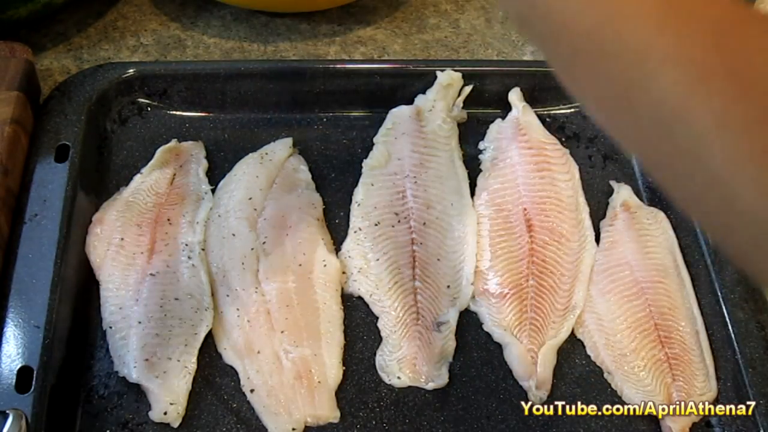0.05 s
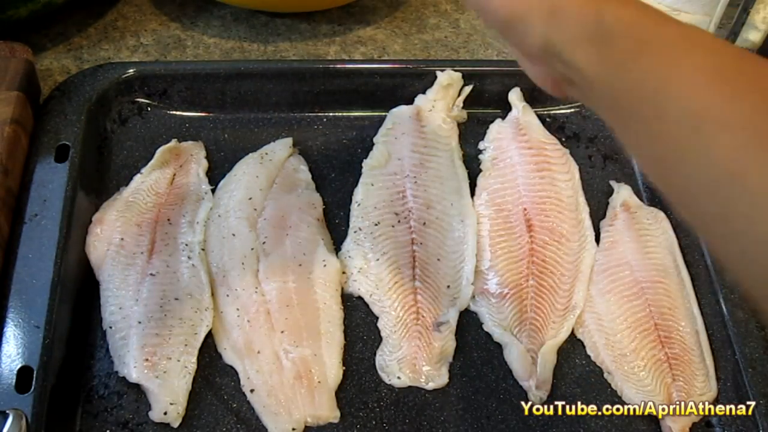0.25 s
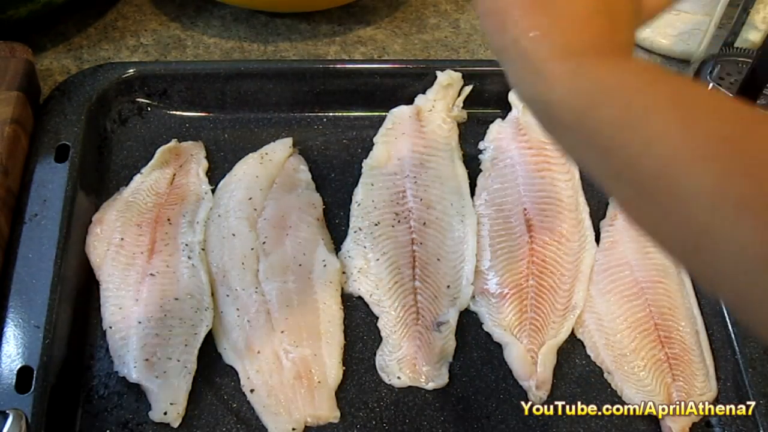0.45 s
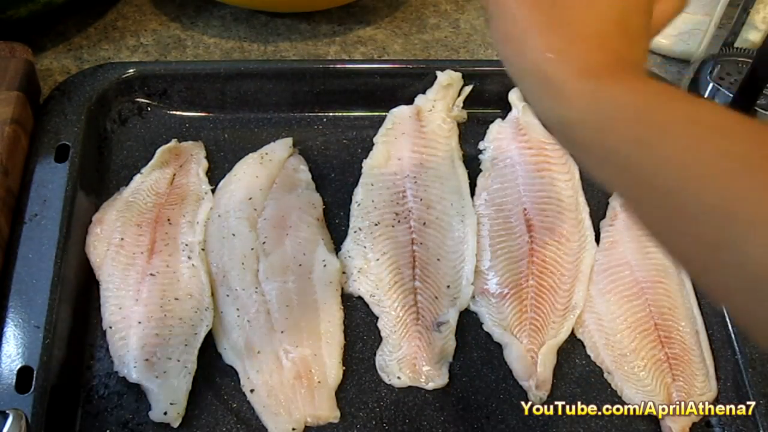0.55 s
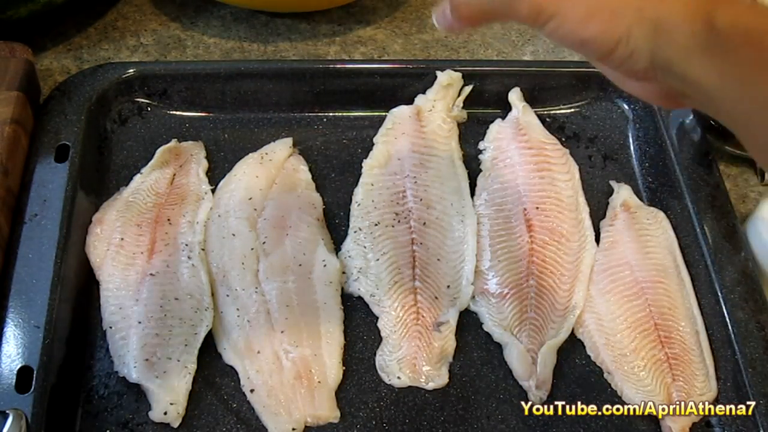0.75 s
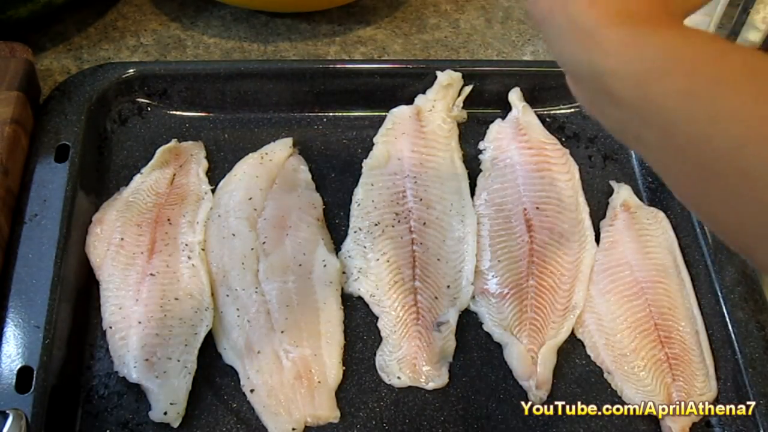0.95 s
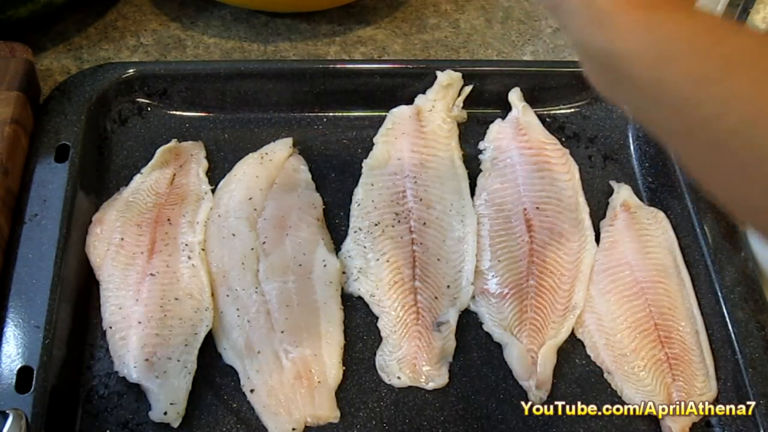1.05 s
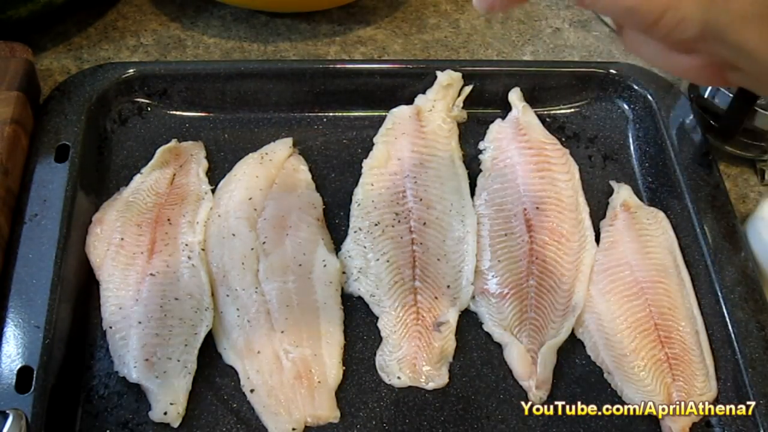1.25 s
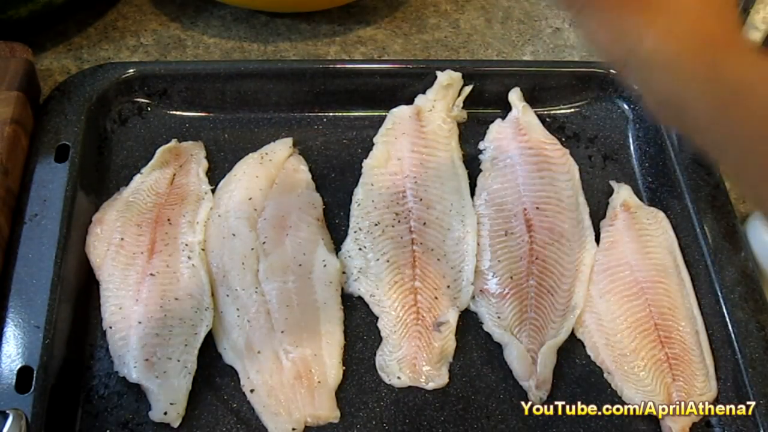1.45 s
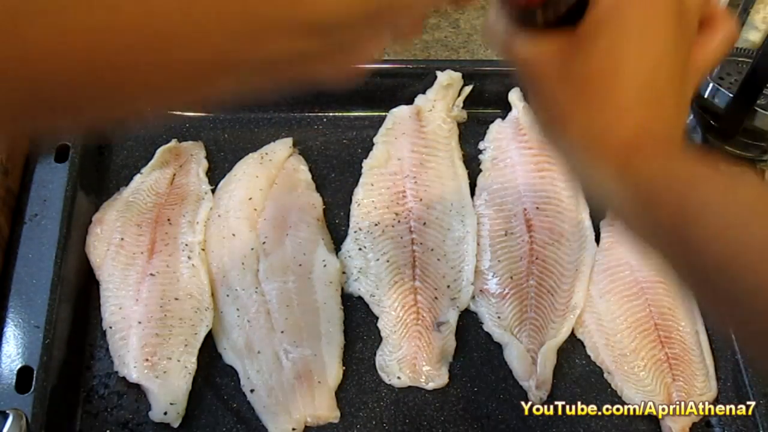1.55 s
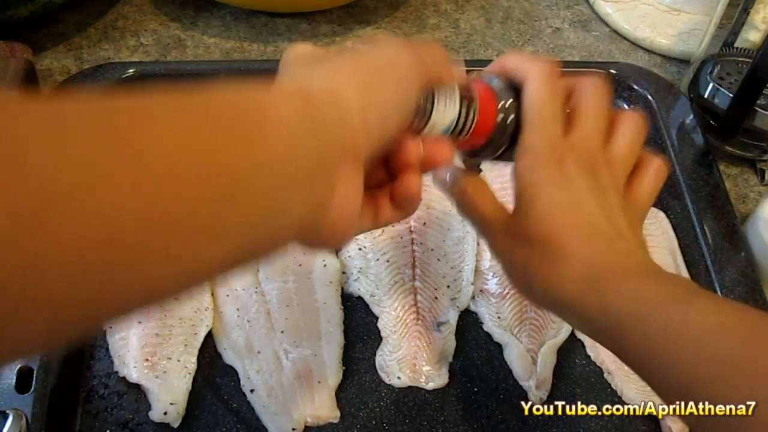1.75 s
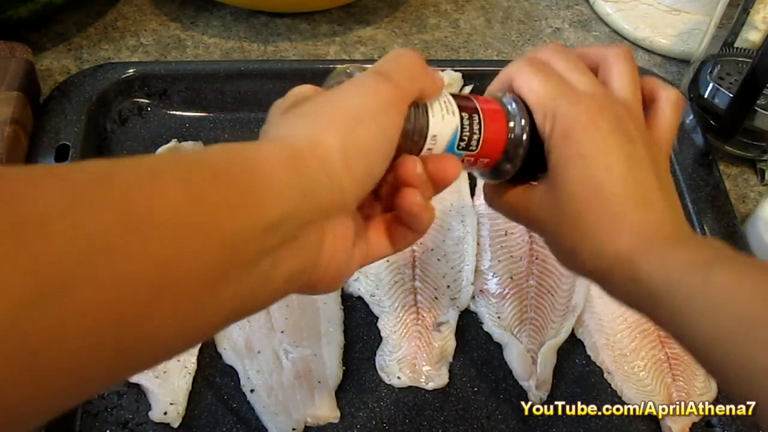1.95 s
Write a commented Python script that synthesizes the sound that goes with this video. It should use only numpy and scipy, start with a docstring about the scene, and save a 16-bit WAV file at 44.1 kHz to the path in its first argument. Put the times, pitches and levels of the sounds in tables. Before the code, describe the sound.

A hand-turned pepper mill grinds peppercorns, close and bright. A faint gritty scrape opens, then hard dry cracks burst at about 0.2-0.3 s and more strongly at 0.4-0.7 s. It softens, then snaps sharply again around 1.1-1.25 s. After a short lull, a faint squeak near 1.5 s and weaker crackles and scrapes trail off. Low appliance hum and short room reflections throughout.

```python
"""A hand-turned pepper mill crushes corns in a kitchen, over room noise and an appliance's hum throughout.
A gritty scrape and a wavering low tone come first, then hard, dry cracks at about 0.2-0.3 s and 0.4-0.7 s;
after a softer spell they return at about 1.1-1.25 s. A lull follows, then weaker cracks, scraping and a squeak.
Bursts of noise for the cracks and a stream of tiny grains for the grit ring the mill's short resonances.
Rubs, squeak and low tone are swells of filtered noise; the hard-walled room answers for a moment."""
import sys
import numpy as np
from scipy import signal
from scipy.fft import rfft, irfft, next_fast_len
from scipy.io import wavfile
from scipy.ndimage import uniform_filter1d, map_coordinates

SR = 44100
rng = np.random.default_rng(int(sys.argv[2]) if len(sys.argv) > 2 else 0)


def to_wav(s):
    """Save 16-bit WAV."""
    ch = np.atleast_2d(s).T  # columns
    pcm = np.round(np.clip(ch, -1, 1) * 32767)  # PCM
    wavfile.write(sys.argv[1], SR, pcm.astype(np.int16))


def boost_factor(decibels):
    """Convert a level in decibels to a linear amplitude factor."""
    exponent = np.asarray(decibels, float) / 20
    return 10 ** exponent


N = 88200

# the mill's resonances: (frequency [Hz], width [Hz], relative level [dB])
MILL = [(1216, 393, -7), (1402, 480, -7.5), (2780, 1020, -4), (4190, 560, -4), (4750, 226, -8),
        (5110, 485, -5), (7390, 2800, 5), (9380, 1950, 6), (11120, 3700, 2), (12980, 1030, -2.5),
        (14600, 12400, -2)]
BODY_HZ, BRIGHT_HZ = 2000, 6000  # the body lies below the first, the bright voice above the second


def unit(x):
    """Scales a sound to an rms of 1."""
    return x / np.sqrt(np.mean(x ** 2) + 1e-20)


def along(points, hz):
    """Reads a curve of (frequency [Hz], value) points on a log frequency axis."""
    f, v = np.transpose(points)
    return np.interp(np.log(hz + 1), np.log(f + 1), v)


def wobble(rate):
    """A smooth random curve through `rate` random points a second."""
    knots = rng.standard_normal(int(N * rate / SR) + 4)
    return map_coordinates(knots, [np.arange(N) * rate / SR])


def filtered(x, response):
    """Passes a sound through a filter, given as a function of frequency."""
    m = next_fast_len(N + SR // 2)  # spare room for the filter to ring out
    spectrum = rfft(x, m) * response(np.fft.rfftfreq(m, 1 / SR))
    return irfft(spectrum, m)[..., :N]


def resonance(f, center, width):
    """A band-pass response, like one springy part that vibrates most strongly at its own pitch."""
    return 1j * f * width / (center * center - f * f + 1j * f * width)


def modes(f):
    """The response of each resonance, one row each; neighbours alternate in sign, with a dip above the body."""
    center, width, db = np.transpose(MILL)[:, :, None]
    sign = (-1.) ** np.arange(len(MILL))[:, None] * np.where(center < BODY_HZ, -1, 1)
    return sign * boost_factor(db) / np.sqrt(width) * resonance(f, center, width)


def cracks():
    """Each splitting corn, a snap and a short noise burst, shakes the mill, most of all near its own pitch."""
    # corns that split, levels before the mill's bass is thinned:
    # (time [s], peak level [dB], body share [dB], favoured pitch [Hz])
    corns = [(0.0381, -45, 9, 4370), (0.1121, -28.5, -10.0, 7950), (0.1463, -27.5, -20, 10060),
             (0.1788, -31.5, -15, 4100), (0.21, -29, 6, 6950), (0.2227, -18.5, 4, 7300),
             (0.2335, -12.5, -1, 6950), (0.2424, -25, -4, 4280), (0.2483, -23.0, -2.0, 7300),
             (0.2701, -17, -4, 2300), (0.2842, -27, -3, 4010), (0.3041, -11, -4.5, 2840),
             (0.345, -32.5, -9.0, 3800), (0.4342, -17.5, -6, 8350), (0.4534, -20, -6, 8000),
             (0.461, -24.5, 4.5, 3900), (0.5428, -29, -7.0, 5230), (0.5752, -21.5, -1, 5600),
             (0.5872, -22.5, -17.0, 9230), (0.59, -14.5, -16, 9000), (0.6055, -12.5, 1, 4630),
             (0.6117, -14, 2.5, 4400), (0.6347, -20.5, -7.0, 3530), (0.6463, -5, 7.0, 3800),
             (0.65, -15.5, 5, 4470), (0.6573, -17, 0.5, 3550), (0.732, -17.5, -9.0, 8330),
             (0.8505, -37, -12, 6420), (0.9275, -36, -6.0, 7300), (0.9356, -32.5, -1, 7620),
             (0.9585, -34, -7.0, 2790), (0.9726, -27, -16.0, 4420), (1.02, -33, -2, 4500),
             (1.0273, -29, -1, 5700), (1.051, -32, -7.0, 8900), (1.0885, -30.5, -4, 11190),
             (1.1034, -23.5, -1.0, 7460), (1.1249, -16.5, 2.5, 4220), (1.1284, -6.5, -4, 7700),
             (1.1374, -33, 2, 7950), (1.1528, -22, -5.0, 7400), (1.1593, -14.5, -8.0, 7700),
             (1.1716, -17, -7, 3520), (1.174, -17.5, -6, 10400), (1.1903, -18, -5, 3000),
             (1.222, -19.5, -19, 5100), (1.244, -21, -7.0, 12460), (1.247, -22, -13, 11500),
             (1.4396, -39, -12.0, 5160), (1.4567, -38.0, -13.0, 10500), (1.4696, -33.5, -2, 9700),
             (1.4734, -38, -2.0, 8850), (1.4828, -35, -1, 5230), (1.4845, -27, -6.0, 9600),
             (1.4958, -42, -4, 5230), (1.508, -31, -4.0, 5300), (1.5176, -34, -13, 8480),
             (1.5214, -31.5, -10, 8300), (1.5637, -33, -12, 7960), (1.5866, -33.0, -6.0, 7600),
             (1.6415, -27, -18, 6200), (1.651, -32, -5, 8120), (1.6583, -40, -4, 5630),
             (1.675, -28.5, -1.0, 7400), (1.682, -36, -1, 8100), (1.6947, -29.5, -3, 7600),
             (1.7786, -38, 0.0, 2360), (1.7967, -37, 2, 4340), (1.8118, -26, 2, 3250),
             (1.8237, -36.5, 2, 2380), (1.8389, -39, -3.0, 8850), (1.8891, -32, -8.0, 4600),
             (1.9027, -35, -6.0, 6700), (1.924, -38, -4.0, 6150), (1.9351, -35.5, 1, 3920)]
    rise_s, t60_s = 0.00015, 0.0158  # the burst's rise and its time to fall by 60 dB
    snap_db, snap_grows = 17, 0.3  # basic snap; extra dB per dB of crack above -20 dB
    favour_db, favour_q = 9, 3.5  # lift of the favoured pitch over the rest, and its sharpness
    scatter_db = 3  # random spread of each resonance's strength
    size = 2048
    out = np.zeros(N + size)
    t = np.arange(size // 2) / SR
    f = np.fft.rfftfreq(size, 1 / SR)
    shape = (1 - np.exp(-t / rise_s)) * boost_factor(-60 * t / t60_s)
    snap = boost_factor(snap_db) * (np.arange(len(t)) == shape.argmax())  # one sample at the burst's top
    low = np.transpose(MILL)[0][:, None] < BODY_HZ
    for s, db, body_db, hz in corns:
        favour = boost_factor(-favour_db) + resonance(f, hz, hz / favour_q)
        scatter = boost_factor(scatter_db * rng.standard_normal((len(MILL), 1)))
        gains = scatter * np.where(low, boost_factor(body_db), favour)
        burst = shape * rng.standard_normal(len(t))
        sharp_snap = snap * boost_factor(snap_grows * max(db + 20, 0))
        mill_response = (gains * modes(f)).sum(axis=0)
        hit = irfft(rfft(burst + sharp_snap, size) * mill_response, size)
        peak = np.sqrt(2 * uniform_filter1d(hit ** 2, size=44).max())  # from the strongest 1 ms
        out[round(s * SR):][:len(hit)] += boost_factor(db) * hit / peak
    return out[:N]


def voicing(body_db, dull_db):
    """Boosts the body; dullness [dB] lifts the middle voice by half and lowers the bright voice by half."""
    hz = np.transpose(MILL)[0][:, None]
    upper_db = np.where(hz < BRIGHT_HZ, dull_db, -dull_db) / 2
    return np.where(hz < BODY_HZ, body_db, upper_db)


def ring(drive):
    """Each row of drive shakes its own resonance; the results add up."""
    return filtered(drive, modes).sum(axis=0)


def grit():
    """Fragments crumble in clumps of tiny grains over a smooth scrape, following the twist."""
    # twisting hand, levels before voicing and bass thinning:
    # (time [s], grit level [dB], body boost [dB], dullness [dB])
    twist = [(0, -45.5, 4.5, -3), (0.048, -42.5, 7.5, 8.5), (0.091, -52.5, -1, 2), (0.181, -43.5, 3, 1.5),
             (0.241, -28.5, 4, 7.5), (.3, -32.5, -24, 6.5), (.33, -40.5, -19, 3.5), (.42, -52, 6, 10),
             (.44, -44.5, 4, 11), (.48, -37, 6, 6), (0.529, -46.5, -3, 8), (0.592, -32.5, -5.5, 1),
             (.66, -34.5, 5, 5.5), (0.732, -25, -10, -2.5), (0.763, -44, 9, 0.5), (0.849, -54.5, -5, 0),
             (.92, -48, -3, 2), (0.948, -40.5, 6, 6), (0.998, -45.5, -1, 6.5), (1.029, -33.5, -11, -0.5),
             (1.089, -49.5, -5, 5), (1.136, -32, 9.5, 5), (1.248, -33.5, -31, 1), (1.282, -47, -4, 1.5),
             (1.42, -68, 3, -2), (1.491, -39, -5, 5), (1.53, -43, -8, -0.5), (1.56, -48.5, 2, 10),
             (1.63, -42.5, 5, 3), (1.693, -35, -4.5, 1), (1.74, -51, 4, 6.5), (1.8, -58, -4, 6),
             (1.816, -42, -5, 2), (1.871, -60.5, -16, -2), (1.921, -48.5, -3, 2), (2.0, -60.5, 17, 6)]
    grains_per_s, grain_t60_s = 1200, 0.003
    spread_db, biggest = 6, 2.2  # spread of grain sizes, and the largest size in spreads
    scrape_db, clump_db = -3, 1.5  # scrape against grains; strength of the clumping
    colour_drift_db, sheen_db = 2.16, 1.5  # fine grit favours the two highest resonances
    s, *columns = np.transpose(twist)
    level_db, body_db, dull_db = [np.interp(np.arange(N) / SR, s, c) for c in columns]
    starts = rng.random(N) < grains_per_s / SR
    sizes = starts * boost_factor(spread_db * np.minimum(rng.exponential(size=N), biggest))
    t = np.arange(400) / SR
    grains = signal.fftconvolve(sizes, boost_factor(-60 * t / grain_t60_s))[:N]
    force = unit(grains) + boost_factor(scrape_db)
    colour_db = [colour_drift_db * wobble(90) + sheen_db * (hz > MILL[-3][0]) for hz, *_ in MILL]
    drive = force * boost_factor(colour_db) * rng.standard_normal(N)
    rms = np.std(ring(drive))
    motion_db = level_db + clump_db * wobble(70.04) + voicing(body_db, dull_db)
    return ring(drive * boost_factor(motion_db)) / rms


def noise_swells():
    """Uneven swells of noise, each around one pitch: the hand's rubs and shifts, a squeak near 5400 Hz,
    and a wavering low tone near 205 Hz, perhaps an appliance."""
    # (time [s], length [s], level [dB], pitch [Hz], width [Hz])
    pitched_noises = [(0.143, 0.084, -52, 720, 910), (0.138, 0.15, -51.5, 205, 52),
                      (0.262, 0.047, -48.5, 440, 560), (0.592, 0.088, -47.5, 550, 650),
                      (0.687, 0.053, -42.5, 283, 175), (0.69, 0.057, -48, 730, 440),
                      (1.465, .07, -45, 5400, 320), (1.9, 0.024, -52, 750, 640),
                      (1.76, 0.02, -53.5, 628, 250), (1.095, 0.13, -51, 837, 500),
                      (1.803, 0.033, -49.5, 1775, 570)]
    rough_db = 2  # unevenness
    t = np.arange(N) / SR
    out = np.zeros(N)
    for s, length, db, center, width in pitched_noises:
        # filtering twice narrows the noise around its pitch
        tone = filtered(rng.standard_normal(N), lambda f: resonance(f, center, width) ** 2)
        swell = np.sqrt(np.sin(np.pi * np.clip((t - s) / length, 0, 1)) + 1e-12)
        uneven = boost_factor(rough_db * wobble(center / 30))
        out += boost_factor(db) * unit(tone * swell * uneven) * np.std(swell)
    return out


def kitchen(x):
    """Hard walls answer with a fading noise tail, drawn anew for each tenth of a second of sound."""
    # how long the room rings: (frequency [Hz], time to fall by 60 dB [s])
    decay = [(300, 0.42), (1500, 0.22), (5000, 0.39), (14000, 0.19)]
    first_wall_s = 0.0043  # delay of the first answer
    out = np.zeros(N + SR)
    step = SR // 10
    for a in range(0, N, step):
        hz, t, z = signal.stft(rng.standard_normal(SR // 2), SR, nperseg=256)
        fade = boost_factor(-60 * t / along(decay, hz)[:, None])
        tail = signal.istft(z * fade, SR, nperseg=256)[1]
        wet = signal.fftconvolve(x[a:a + step], tail / np.linalg.norm(tail))
        out[a + round(first_wall_s * SR):][:len(wet)] += wet
    return out[:N]


def background():
    """An appliance hums in gently wavering sine tones over gently wavering, coloured room noise."""
    # hum tones: (frequency [Hz], average level [dB rms])
    hum_tones = [(46.75, -57), (265, -63), (297, -66)]
    # colour of the room noise: (frequency [Hz], relative level [dB])
    air_colour = [(15, -36), (25, -11), (172, -5.5), (286, -8.5), (335, -7), (404, -5.5), (749, -17),
                  (952, -18.5), (1090, -20.5), (11800, -39.5), (15000, -56)]
    air_db = -53  # average level of the room noise
    t = np.arange(N) / SR
    hum = np.zeros(N)
    for hz, db in hum_tones:
        level = np.sqrt(2) * boost_factor(db + 0.5 * wobble(4.2))
        hum += level * np.sin(2 * np.pi * (hz * t + rng.random()))
    air = unit(filtered(rng.standard_normal(N), lambda hz: boost_factor(along(air_colour, hz))))
    return hum + boost_factor(air_db + 1.2 * wobble(4.2)) * air


def scene():
    """Mill, noise swells, room and background add up at one microphone."""
    thin_hz, wet_db = 664, -11.5  # the small mill radiates little bass; level of the room's answer
    crushing = filtered(cracks() + grit(), lambda f: (1j * f / (thin_hz + 1j * f)) ** 2)
    direct = crushing + noise_swells()
    return (direct + boost_factor(wet_db) * kitchen(direct) + background())[None]


def band_limit(x):
    """A steep low-pass at the top of the band."""
    return signal.sosfilt(signal.butter(12, 16650, fs=SR, output="sos"), x)


def record(dry):
    """Cuts the highest treble; the top bands fall silent moment by moment whenever they are faint; loud peaks
    are rounded off."""
    # all above an edge is muted while the 750 Hz just over it are faint: (edge [Hz], threshold [dB])
    mute_edges = [(13700, -79), (14450, -63), (15200, -56)]
    top_hz, ceiling = 15900, 0.95
    hz, _, z = signal.stft(dry, SR, nperseg=1024)
    z = z * (hz < top_hz)[:, None]
    for low, db in mute_edges:
        above = (hz >= low)[:, None]
        band = above & (hz < low + 750)[:, None]
        strength = np.sqrt((abs(z * band) ** 2).sum(axis=1, keepdims=True))
        z = z * ~(above & (strength < boost_factor(db)))
    x = signal.istft(z, SR, nperseg=1024)[1][:, :N]
    mix = x / (1 + abs(x / ceiling) ** 6) ** (1 / 6)  # soft ceiling
    return band_limit(mix)


dry = scene()
out = record(dry)
to_wav(out)
```